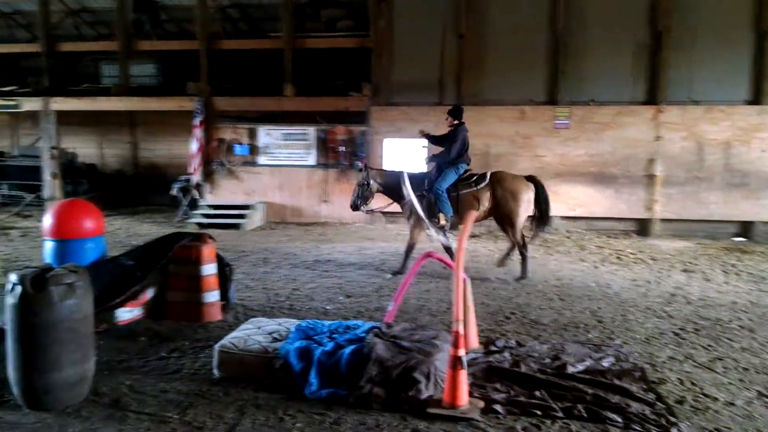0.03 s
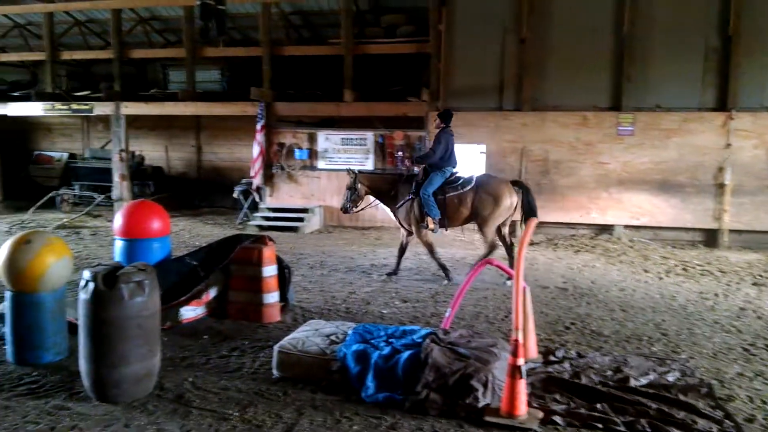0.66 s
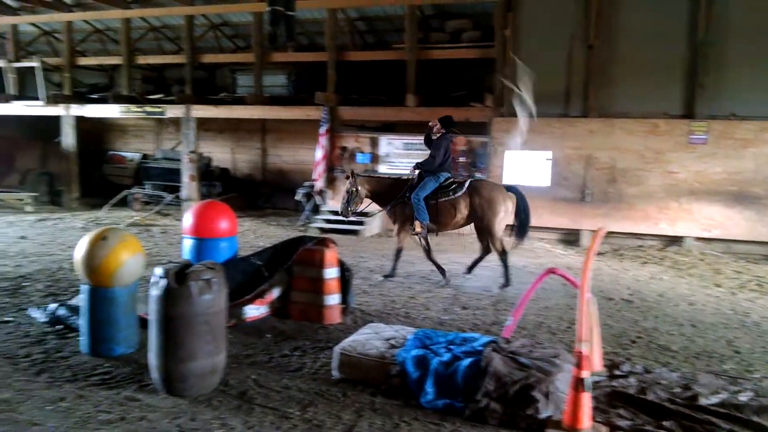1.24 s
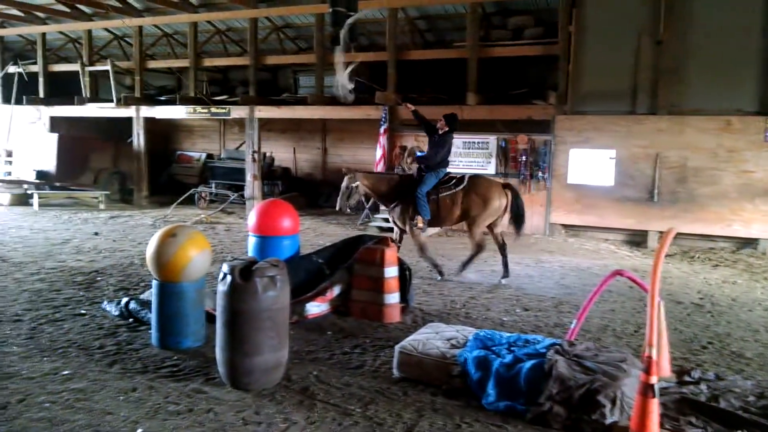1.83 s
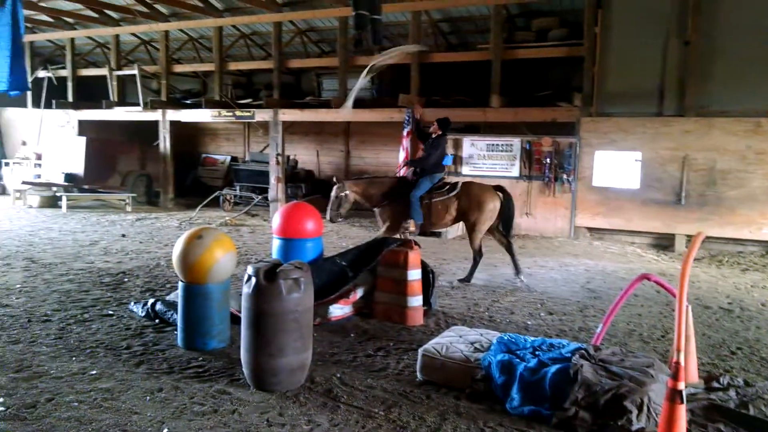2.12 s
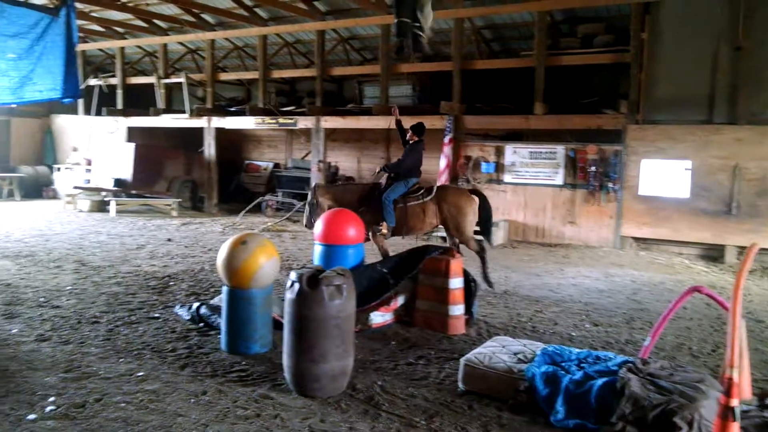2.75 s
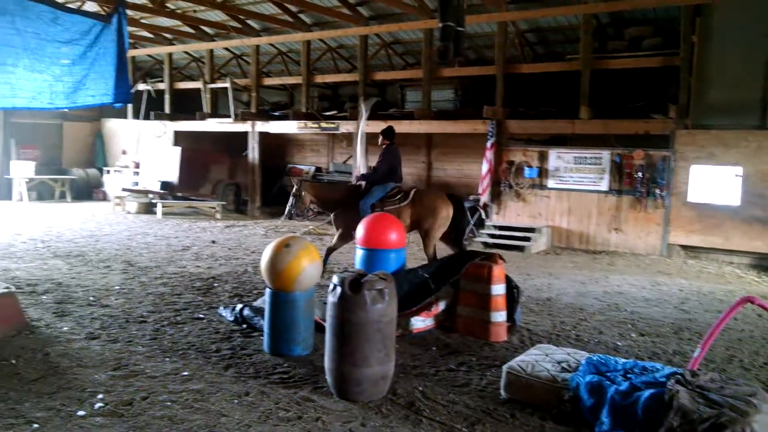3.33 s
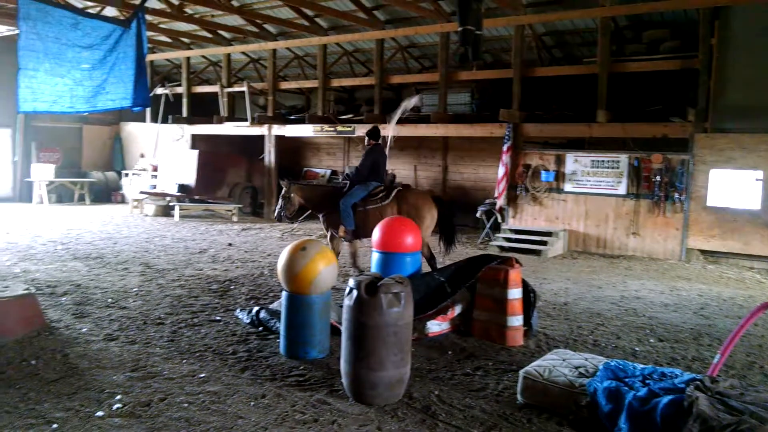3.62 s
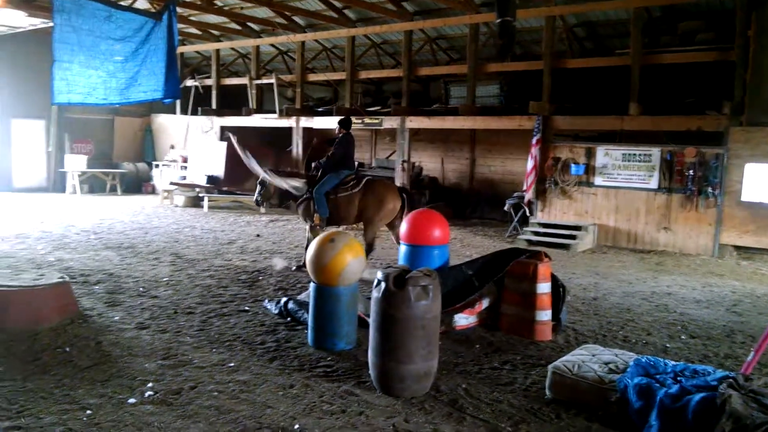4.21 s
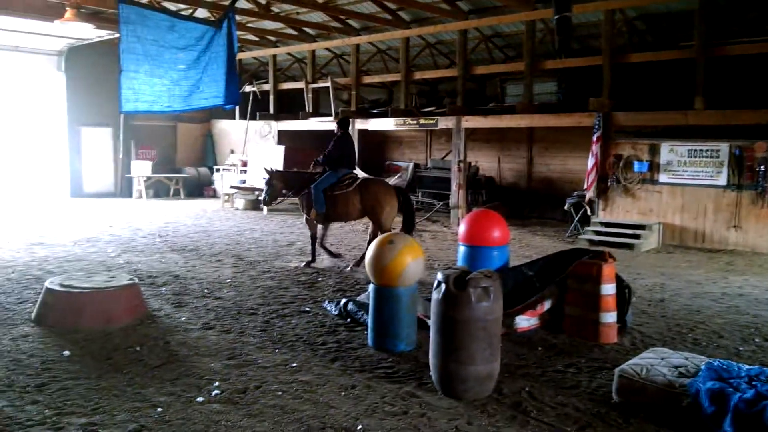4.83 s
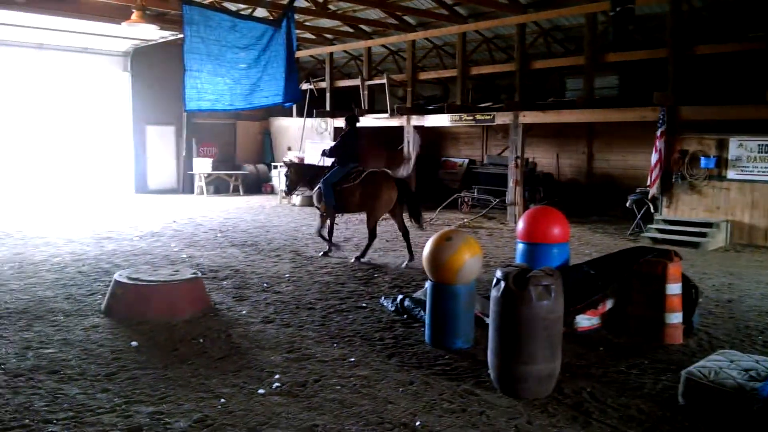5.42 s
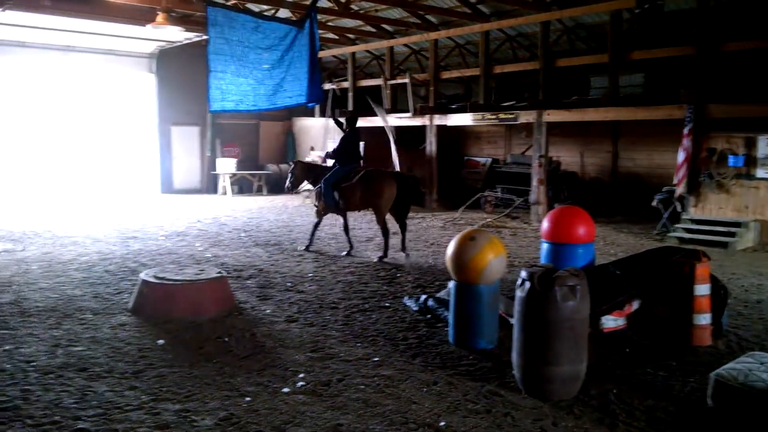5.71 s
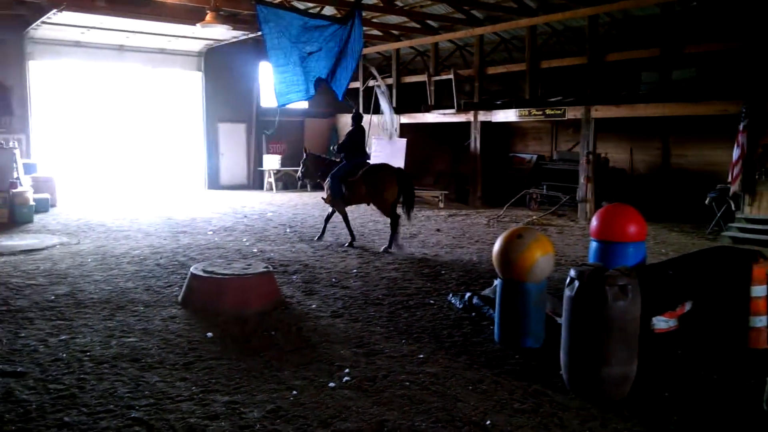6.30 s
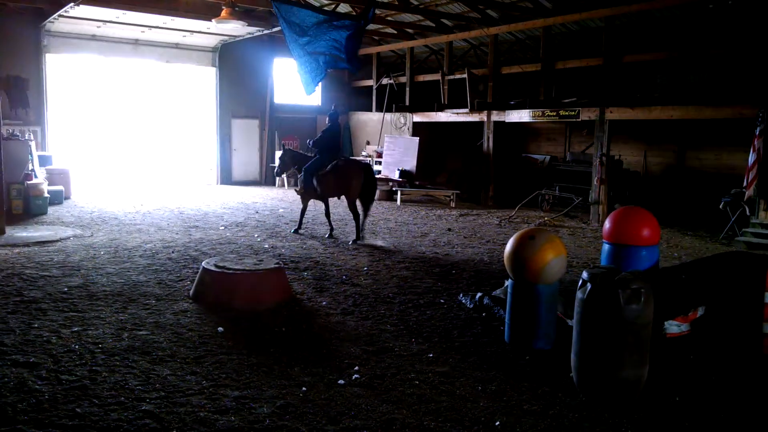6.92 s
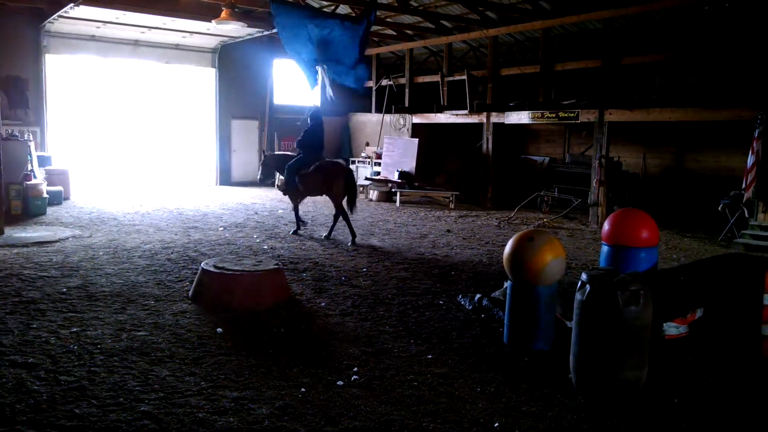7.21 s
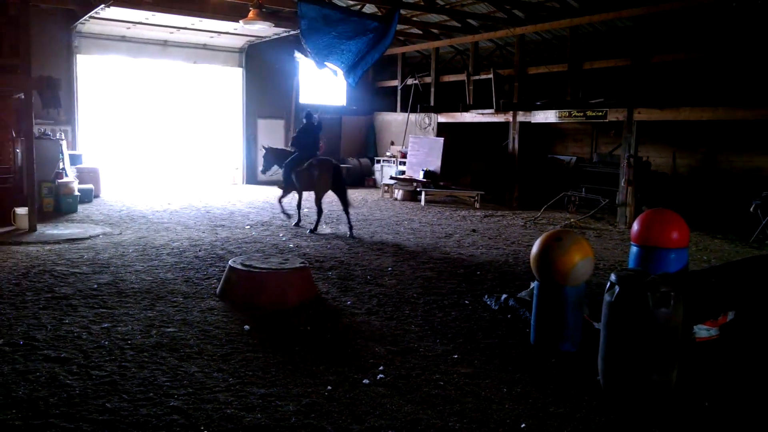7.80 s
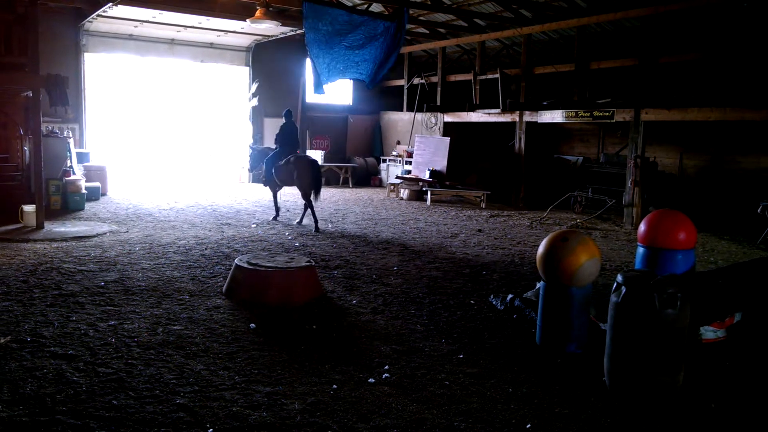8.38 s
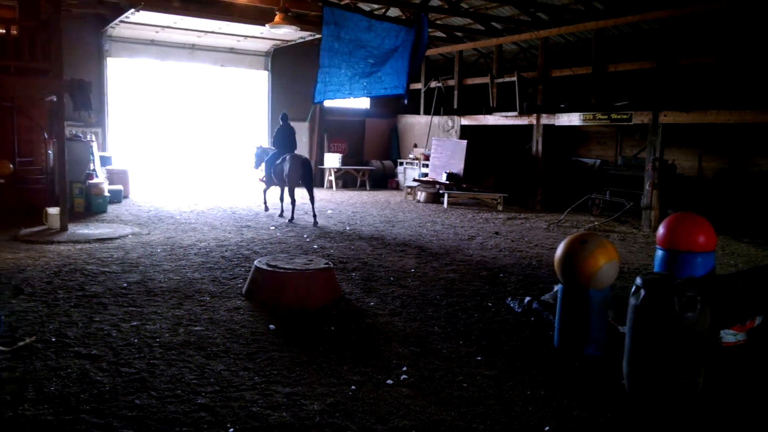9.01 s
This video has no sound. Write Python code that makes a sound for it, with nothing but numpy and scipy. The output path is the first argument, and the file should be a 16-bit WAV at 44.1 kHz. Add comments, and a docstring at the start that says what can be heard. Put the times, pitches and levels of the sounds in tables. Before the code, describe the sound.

Light rustles of a swung flag build to sharp cracks and soft whumps over faint hoof steps in a ringing hall.

```python
"""Light swishes and ticks of a cloth flag over a low rumble: a rider swings it on a stick in a wooden arena.
Ripples crinkle the fabric and shove the air, the sheet fills with soft whumps, the free edge snaps.
The walking horse's hooves knock dully; a hollow body is bumped once; far off, a thin whistle and squeaks.
The hall rings after every swing, and a small two-port microphone widens the sound."""
import sys
import numpy as np
from scipy import signal
from scipy.fft import rfft, irfft, next_fast_len
from scipy.io import wavfile

SR = 44100
rng = np.random.default_rng(int(sys.argv[2]) if len(sys.argv) > 2 else 0)


def output_pcm(signal):
    """Save a mono or channel-first signal as 16-bit PCM at the path in sys.argv[1].

    Samples are clipped to [-1, 1] before scaling.
    """
    pcm = np.clip(np.atleast_2d(signal).T, -1, 1) * 32767
    wavfile.write(sys.argv[1], SR, np.round(pcm).astype(np.int16))


N = 403515
TIME = np.arange(N) / SR

# Spectra of hall hush, fabric rustle, pushed air, full crack and thin tick.
# Each row: frequency in Hz, relative density in dB.
HUSH_SPECTRUM = [(20, 1.5), (60, -6), (150, 2), (600, 1), (1500, -10.5), (4000, -17), (9000, -30),
                 (15500, -30)]
RUSTLE_SPECTRUM = [(500, -16), (1200, -1.5), (1750, 0), (2600, -1), (3600, -0.5), (4400, -3.5), (5200, -2),
                   (7000, -2), (9500, -2), (12000, -3.5), (14000, -5.5), (15500, -7)]
BILLOW_SPECTRUM = [(25, -27), (60, -13.5), (120, -12), (250, -5.5), (450, -0.5), (650, 2), (900, -3.5),
                   (1250, -8.5), (1750, -5.5), (2300, -8.5), (3500, -12), (7000, -18.5), (15000, -54)]
CRACK_SPECTRUM = [(300, -49), (1000, 9), (1800, 8), (3600, 11.5), (5000, 6.5), (6500, 7), (9000, 4),
                  (12000, 0.5), (15500, -10)]
TICK_SPECTRUM = [(2000, -49), (6000, -13), (9000, 7.5), (11000, 5.5), (13000, 7), (15500, -1)]
# Low hum. Each row: pitch in Hz, starting level in dB.
HUM_TONES = [(69, -55), (107, -61)]
# Hall tail. Each row: band centre in Hz, T60 in seconds, gain in dB.
HALL_BANDS = [(100, 1.5, 1.5), (388, 1.33, 1), (1000, 0.9, 0.5), (2320, 0.77, -3.5), (5000, 0.57, -3),
              (8460, 0.47, -6), (15200, 0.33, -7.5)]
# Whistle envelope. Each row: time in seconds, level in dB.
WHISTLE_ENVELOPE = [(.72, -80), (.79, -52), (.9, -59), (1.15, -63), (1.55, -59), (1.75, -82)]
# Far squeaks. Each row: peak time in seconds, level in dB, pitch in Hz, half length in seconds.
FAR_SQUEAKS = [(8.868, -38, 797, 0.019), (8.963, -49, 755, .018), (9.013, -47, 790, .022)]
# Modes of the bumped body. Each row: pitch in Hz, level in dB, T60 in seconds.
BODY_MODES = [(196, -41, 0.41), (274.5, -29, 0.64), (392, -34.5, 0.97), (452, -31, 0.58), (562, -40, 0.75),
              (595, -32, 0.21), (624, -32, 0.42), (710, -33, 0.33), (1140, -33.5, .3)]
# Hoof knocks. Each row: start in seconds, level in dB, pitch in Hz, decay in seconds, ringing share 0-1.
HOOF_KNOCKS = [(0.214, -33, 725, 0.0058, 0.5), (3.099, -42, 1173, 0.025, 0.7),
               (3.101, -32, 718, 0.026, 0.4), (3.102, -38, 970, 0.043, 1), (3.148, -38, 978, 0.023, 1),
               (3.635, -30.5, 195, 0.013, 0), (5.075, -35, 668, 0.033, 0.45),
               (5.092, -42.5, 865, 0.043, 0.66), (5.106, -37, 1510, 0.025, 0.4),
               (5.274, -33, 1060, 0.022, 0.43), (5.55, -33.5, 332, 0.012, 0.04),
               (5.553, -37, 620, .008, .1), (5.573, -41, 556, 0.0061, 0.1), (8.851, -39, 850, .012, .1)]
# Cloth going taut. Each row: start in seconds, level in dB, pitch and nominal width in Hz,
# decay and rise in seconds.
CLOTH_WHUMPS = [(1.717, -32, 190, 110, 0.033, .015), (2.695, -20, 424, 130, 0.03, 0.0032),
                (2.694, -35, 185, 50, 0.041, 0.0032), (2.703, -30, 680, 200, 0.025, 0.0036),
                (4.082, -35.5, 263, 190, 0.074, 0.0092), (4.091, -47, 95, 60, 0.094, 0.018),
                (4.268, -33.5, 402, 220, 0.024, 0.009), (5.953, -29.5, 68, 70, 0.033, 0.0056),
                (5.964, -29, 950, 220, 0.022, .004), (5.965, -30.5, 200, 80, 0.045, .01),
                (6.439, -28, 596, 131, 0.093, 0.044), (6.673, -19, 383, 108, 0.031, 0.014),
                (7.287, -22, 1400, 1200, .015, .005), (7.304, -18.5, 620, 168, 0.077, 0.014),
                (7.33, -22, 1710, 300, .03, 0.0053), (7.434, -40, 603, 171, 0.024, 0.006),
                (7.342, -29, 170, 120, 0.072, 0.0087), (7.97, -39.5, 160, 109, 0.1, 0.022),
                (8.311, -35, 200, 160, 0.04, 0.0036)]
# Edge snaps. Each row: start in seconds, relative level in dB, decay in seconds, thin tick share 0-1.
EDGE_SNAPS = [(0.021, -32, 0.0022, 0.4), (.107, -33, .002, 0.8), (0.213, -23.5, 0.0056, 0.55),
              (.388, -33, .002, 0.6), (0.8265, -24, 0.0048, 0.99), (.914, -36, .005, 1),
              (0.952, -31, .003, 1), (1.034, -30.5, 0.0015, .95), (1.058, -28, 0.002, 0.7),
              (1.06, -23, .0015, 0.5), (1.085, -20, 0.0015, 0.5), (1.364, -35, .006, 1),
              (1.405, -19.5, 0.002, 0.96), (1.739, -20, .004, 0.85), (2.287, -21, 0.0027, 0.7),
              (3.305, -37, .004, 0.6), (4.286, -32, .003, .7), (4.488, -29, 0.004, 0.74),
              (4.57, -31, 0.002, 1), (5.554, -29, 0.0043, 0.5), (5.8915, -15, 0.0018, 0.9),
              (5.9622, -3.5, 0.0034, 0.1), (5.968, -15, .002, 0.2), (6.565, -20, 0.0014, 0.2),
              (6.6354, -4.5, 0.0036, 0), (7.288, -11.5, 0.018, 0.1), (7.3256, -13, 0.003, 0),
              (7.331, -9, 0.0076, 0), (7.4072, -9, .001, .7), (8.368, -24, 0.0027, 0.8),
              (9.06, -35, .01, 0.7)]
# Flag strokes. Each row: fastest moment in seconds, relative rustle and billow levels in dB,
# swell and fade in seconds.
FLAG_STROKES = [(.098, -42, -45.5, 0.052, 0.055), (.2, -39, -49, 0.05, 0.064), (.645, -36, -42, 0.1, 0.082),
                (.825, -45, -44.5, 0.1, 0.033), (.958, -48, -39.5, 0.044, 0.016),
                (1.165, -36, -41, 0.15, 0.11), (1.41, -50, -43, 0.072, 0.015),
                (1.585, -40, -62, 0.048, 0.07), (1.752, -25, -31.5, 0.033, 0.073),
                (1.95, -38.5, -41.5, 0.067, 0.091), (2.18, -42, -56, 0.033, .04),
                (2.234, -28.5, -49, 0.02, 0.015), (2.286, -27.5, -42, .011, 0.037),
                (2.38, -38, -39.5, 0.11, 0.09), (2.655, -32, -35, 0.057, 0.083),
                (2.721, -20.5, -29.5, 0.026, 0.036), (3.0, -40, -54, .03, 0.065),
                (3.14, -40, -40, 0.04, 0.031), (3.305, -36.5, -36, 0.077, 0.067),
                (3.42, -40.5, -48, 0.062, 0.14), (3.65, -41.5, -43, 0.12, 0.16),
                (3.785, -41, -61, 0.06, 0.035), (4.135, -35.5, -41, 0.092, 0.12),
                (4.295, -36.5, -46.5, 0.059, 0.047), (4.72, -49.5, -52, 0.4, 0.65),
                (5.095, -39, -53, 0.048, 0.037), (5.205, -41.5, -43.5, 0.06, 0.077),
                (5.561, -38, -44.5, 0.0054, 0.098), (5.85, -45, -44, 0.14, 0.087),
                (5.905, -29, -36, 0.016, 0.033), (5.949, -15, -22.5, 0.011, 0.016),
                (5.968, -23.5, -22, 0.0053, 0.057), (6.17, -41.5, -33, 0.027, 0.036),
                (6.227, -26, -38, 0.015, 0.018), (6.29, -35, -38.5, 0.051, 0.076),
                (6.45, -40, -39.5, 0.071, 0.08), (6.606, -22.5, -30, 0.025, .02),
                (6.642, -17, -23.5, 0.031, 0.066), (6.725, -46, -27, 0.085, 0.12),
                (6.93, -33, -28.5, 0.033, 0.071), (7.075, -31, -26.5, 0.095, 0.04),
                (7.179, -28, -37, 0.04, 0.037), (7.26, -26, -39, 0.018, 0.016),
                (7.302, -18, -21, 0.016, 0.065), (7.34, -28, -20, 0.026, 0.04),
                (7.408, -22.5, -22, 0.042, 0.086), (7.548, -26, -44, 0.063, 0.0085),
                (7.8, -44, -46.5, 0.25, 0.56), (7.985, -30, -34.5, 0.069, 0.049),
                (8.058, -27.5, -28, 0.04, 0.022), (8.39, -37, -36.5, 0.18, 0.15),
                (9.1, -38, -67, 0.025, 0.29)]
# Microphone ports. Each row: frequency in Hz, crossfeed share 0-1 (capped in use), side gain in dB.
MIC_PORTS = [(30, 0.38, 6), (70, 0.38, -5.5), (151, 0, -2.5), (620, 0.03, -7), (1110, 0.58, -4),
             (1920, 0.37, 2.5), (2470, 0.76, 2.5), (3640, 0.66, -2.5), (4540, 0.6, 1.5), (7160, 0.18, -0.5),
             (13000, 0.37, 0), (16000, 1, -1)]

HARD_STROKE_DB = -37   # above this the rustle dulls and folds less
PAN_RIGHT = np.array([[-1], [1]])


def from_db(db):
    """Decibels to gain."""
    return 10 ** (np.asarray(db) / 20)


def unit_rms(x):
    """Scale to unit power."""
    return x / np.sqrt(np.mean(x ** 2) + 1e-20)


def at_hz(rows, hz):
    """Table columns interpolated over log frequency."""
    points_hz, *columns = np.transpose(rows)
    return [np.interp(np.log(hz + 1), np.log(points_hz), column) for column in columns]


def colour(x, spectrum):
    """Apply a smooth spectrum; unit power."""
    size = next_fast_len(N)
    level_db, = at_hz(spectrum, np.fft.rfftfreq(size, 1 / SR))
    return unit_rms(irfft(rfft(x, size) * from_db(level_db), size)[..., :N])


def drift(rate_hz):
    """Slow random wander of unit power."""
    hop, settle = 40, 2000
    pole = np.exp(-2 * np.pi * rate_hz * hop / SR)
    noise = rng.standard_normal(N // hop + settle + 2)
    slow = signal.lfilter([1], [1, -2 * pole, pole ** 2], noise)[settle:]
    return np.interp(np.arange(N) / hop, np.arange(len(slow)), unit_rms(slow))


def wavering(hz, waver, rate_hz):
    """Unit-power tone of wandering pitch."""
    pitch_hz = hz * (1 + waver * drift(rate_hz))
    return np.sqrt(2) * np.sin(2 * np.pi * np.cumsum(pitch_hz) / SR)


def band_noise(size, hz, stage_width_hz):
    """Noise through two equal resonators."""
    radius = np.exp(-np.pi * stage_width_hz / SR)
    resonator = [1, 0, -1], [1, -2 * radius * np.cos(2 * np.pi * hz / SR), radius ** 2]
    once = signal.lfilter(*resonator, rng.standard_normal(size))
    return signal.lfilter(*resonator, once)


def puff(hz, width_hz, envelope):
    """Band noise burst with the power of its envelope."""
    noise = band_noise(SR, hz, 2 * width_hz)[-len(envelope):]
    return unit_rms(noise * envelope) * np.sqrt(np.mean(envelope ** 2))


def highpass(x, hz):
    """Second-order high-pass."""
    return signal.sosfilt(signal.butter(2, hz, "high", fs=SR, output="sos"), x)


def add(track, start_s, sound):
    """Mix a sound into a track."""
    start = max(round(start_s * SR), 0)
    track[start:start + len(sound)] += sound[:N - start]


def background(fall_db_per_s=6, rumble_rest_db=-60, pan_db=1.5):
    """Even hall hush, a microphone rumble that sinks to a steady level, and a fading hum."""
    fall_db = fall_db_per_s * TIME
    rumble_db = np.maximum(-51.5 - fall_db, rumble_rest_db)
    rumble = from_db(rumble_db) * unit_rms(band_noise((2, N), hz=58, stage_width_hz=62))
    hum = sum(from_db(db - fall_db) * wavering(hz, waver=0.033, rate_hz=4) for hz, db in HUM_TONES)
    hush = from_db(-48) * colour(rng.standard_normal((2, N)), HUSH_SPECTRUM)
    return hush + from_db(pan_db * PAN_RIGHT) * (rumble + hum)


def arena(x, build_s=0.00016):
    """Dense hall tail, separate at each port; the treble dies first."""
    t = TIME[:3 * SR // 2]
    hz = np.fft.rfftfreq(len(t), 1 / SR)
    centres_hz = np.array(HALL_BANDS)[:, 0]
    noise, tail = rfft(rng.standard_normal((2, len(t)))), 0
    for (_, t60_s, gain_db), selector in zip(HALL_BANDS, np.eye(len(HALL_BANDS))):
        band = np.interp(np.log(hz + 1), np.log(centres_hz), selector)
        envelope = from_db(-60 * t / t60_s) * (1 - np.exp(-t / build_s))
        envelope /= np.sqrt(np.sum(envelope ** 2))
        tail = tail + from_db(gain_db) * irfft(noise * band, len(t)) * envelope
    return signal.fftconvolve(x[None], tail, axes=1)[:, :N]


def sweep_through_hall(x, patterns):
    """The wide, moving cloth wanders between several echo patterns."""
    weights = np.array([drift(rate_hz=12.7) for _ in range(patterns)])
    weights /= np.sqrt(np.sum(weights ** 2, axis=0))
    return sum(arena(x * weight) for weight in weights)


def direct_path(x, wide_above_hz=4800, side_db=2.5):
    """Straight sound: body alike at both ports, fine treble spread wide."""
    scrambled = highpass(x, wide_above_hz) * rng.choice([-1, 1], N)
    side = from_db(side_db) * highpass(scrambled, wide_above_hz)
    return from_db(-4) * np.array([x + side, x - side])


def whistle():
    """One faint, thin tone hangs in the hall."""
    level_db = np.interp(TIME, *np.transpose(WHISTLE_ENVELOPE), left=-np.inf, right=-np.inf)
    return from_db(level_db) * wavering(hz=990, waver=0.01096, rate_hz=10)


def squeaks(rasp_db=-1):
    """Short, far hoots with a rasp; each swells and fades."""
    out = np.zeros(N)
    for peak_s, db, hz, half_s in FAR_SQUEAKS:
        rasp = from_db(rasp_db) * unit_rms(band_noise(N, hz, stage_width_hz=330))
        envelope = from_db(db) * np.exp(-((TIME - peak_s) / half_s) ** 2)
        out += envelope * (wavering(hz, waver=0.045, rate_hz=61.7) + rasp)
    return out


def bump(start_s=2.694, rise_s=0.0042):
    """A soft blow rings a hollow body; it flexes, so its modes wander in pitch."""
    out, t = np.zeros(N), TIME[:SR]
    for hz, db, t60_s in BODY_MODES:
        envelope = from_db(db - 60 * t / t60_s) * (1 - np.exp(-t / rise_s))
        mode = wavering(hz, waver=0.024, rate_hz=23)[:SR] / np.sqrt(2)
        add(out, start_s, envelope * mode)
    return out


def hooves(contact_db=-14, contact_s=0.0027, attack_s=0.00058):
    """Each knock: a brief contact, then one hollow mode inside a broad thud."""
    out, t = np.zeros(N), TIME[:SR // 2]
    attack = 1 - np.exp(-t / attack_s)
    for start_s, db, hz, decay_s, ringing in HOOF_KNOCKS:
        decay = np.exp(-t / decay_s)
        mode = np.sqrt(2 * ringing) * decay * np.sin(2 * np.pi * hz * t)
        contact = from_db(contact_db) * puff(4.4 * hz, hz, np.exp(-t / contact_s))
        thud = puff(hz, 0.62 * hz, decay)
        knock = mode + np.sqrt(1 - ringing) * (contact + thud)
        add(out, start_s, from_db(db) * attack * knock)
    return out


def whumps():
    """The sheet fills and goes taut: a soft puff of air, pitched by the size of the fold."""
    out, t = np.zeros(N), TIME[:SR // 2]
    for start_s, db, hz, width_hz, decay_s, rise_s in CLOTH_WHUMPS:
        envelope = (1 - np.exp(-t / rise_s)) * np.exp(-t / decay_s)
        add(out, start_s, from_db(db) * puff(hz, width_hz, envelope))
    return out


def creases(per_s, spread_db):
    """Tiny buckles of the fabric: random clicks of uneven size."""
    buckles = rng.random(N) < per_s / SR
    signs = rng.choice([-1, 1], N)
    size_db = spread_db * np.minimum(rng.exponential(1, N), 4)
    return unit_rms(buckles * signs * from_db(size_db))


def crinkles(rustle_db, offset_db=-14.5, decay_s=0.00018):
    """Larger folds pop out of the rustle; they stand out less when hard strokes pull the cloth taut."""
    clicks = creases(per_s=130, spread_db=1.5) + 1e-18
    envelope = signal.lfilter([1], [1, -np.exp(-1 / (decay_s * SR))], clicks)
    pops = colour(envelope * rng.standard_normal(N), RUSTLE_SPECTRUM)
    taut_db = 0.3 * np.maximum(rustle_db - HARD_STROKE_DB, 0)
    return from_db(rustle_db + offset_db - taut_db) * pops


def snaps(trim_db=-1, rise_share=0.25):
    """The free edge whips round: full cracks, and thin ticks when only the tip flicks."""
    cracks, ticks = np.zeros((2, N))
    t = TIME[:SR // 10]
    for start_s, db, decay_s, thin in EDGE_SNAPS:
        rise = 1 - np.exp(-t / (rise_share * decay_s))
        envelope = from_db(db + trim_db) * rise * np.exp(-t / decay_s)
        add(cracks, start_s, np.sqrt(1 - thin) * envelope)
        add(ticks, start_s, np.sqrt(thin) * envelope)
    cracks *= colour(rng.standard_normal(N), CRACK_SPECTRUM)
    ticks *= colour(rng.standard_normal(N), TICK_SPECTRUM)
    return cracks, ticks


def stroke_levels_db(trail_rustle_db=-50, trail_billow_db=-56, slack_at_s=8.24, slack_db_per_s=6):
    """Rustle and billow swell with each stroke; between strokes the cloth trails until it hangs slack."""
    slack_db = slack_db_per_s * np.maximum(TIME - slack_at_s, 0)
    power = from_db(np.array([[trail_rustle_db], [trail_billow_db]]) - slack_db) ** 2
    for fastest_s, rustle_db, billow_db, swell_s, fade_s in FLAG_STROKES:
        near = slice(*np.searchsorted(TIME, [fastest_s - 0.5, fastest_s + 1]))
        t = TIME[near] - fastest_s
        # Exponent 1 is a straight slope in dB, 2 a rounded bell.
        speed = np.exp(-np.where(t < 0, np.abs(t / swell_s) ** 1.53, np.abs(t / fade_s) ** 1.42))
        power[:, near] += (from_db([[rustle_db], [billow_db]]) * speed) ** 2
    return 10 * np.log10(power)


def flag(rustle_db, billow_db, rustle_trim_db=1, billow_trim_db=1.5):
    """Ripples run down the cloth, crinkling the fabric and shoving the air; hard strokes sound duller."""
    sheen_db = 4.5 - 0.29 * np.maximum(rustle_db - HARD_STROKE_DB, 0)
    ripple = drift(rate_hz=32)
    fabric = colour(creases(per_s=7000, spread_db=2), RUSTLE_SPECTRUM)
    fabric += (from_db(sheen_db) - 1) * highpass(fabric, hz=8800)
    air = colour(creases(per_s=5000, spread_db=3), BILLOW_SPECTRUM)
    rustle = from_db(rustle_db + rustle_trim_db) * unit_rms(fabric * from_db(1.26 * ripple))
    billow = from_db(billow_db + billow_trim_db) * unit_rms(air * from_db(2.04 * ripple))
    return rustle + billow


def scene(crack_send_db=1, tick_send_db=3, bump_send_db=-14):
    """Flag and horse, heard straight and through the hall."""
    rustle_db, billow_db = stroke_levels_db()
    cloth = flag(rustle_db, billow_db) + whumps()
    cracks, ticks = snaps()
    ticks += crinkles(rustle_db)
    steps = hooves()
    hollow = bump()
    far = whistle() + squeaks()
    flag_send = cloth + from_db(crack_send_db) * cracks + from_db(tick_send_db) * ticks
    hall = sweep_through_hall(flag_send, patterns=6)
    hall += arena(steps + far + from_db(bump_send_db) * hollow)
    return direct_path(cloth + cracks + ticks + steps + far) + hollow + hall + background()


def record(dry, cross_lag_s=0.0003878, bass_pan_db=1.5, bass_below_hz=290, cutoff_hz=15520):
    """Two-port microphone: each side subtracts the other, delayed. Bass leans right; the top is cut."""
    size = next_fast_len(N + SR // 10)
    hz = np.fft.rfftfreq(size, 1 / SR)
    left, right = rfft(dry, size)
    share, side_db = at_hz(MIC_PORTS, hz)
    share = np.clip(share, 0, 0.95)
    cross = share * np.exp(-2j * np.pi * hz * cross_lag_s)
    mid = (left + right) / 2 * (1 - cross)
    side = (left - right) / 2 * (1 + cross) * from_db(side_db)
    pan = from_db(bass_pan_db * PAN_RIGHT / (1 + (hz / bass_below_hz) ** 4))
    ports = pan * np.array([mid + side, mid - side]) / np.sqrt(1 + share ** 2)
    lowpass = signal.ellip(14, 0.2, 90, cutoff_hz, fs=SR, output="sos")
    return signal.sosfilt(lowpass, irfft(ports, size)[:, :N])


dry = scene()
out = record(dry)
output_pcm(out)
```